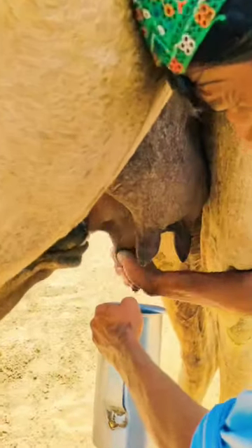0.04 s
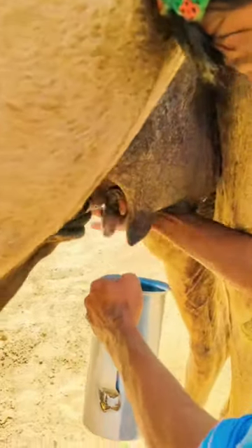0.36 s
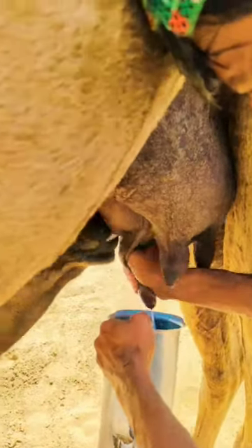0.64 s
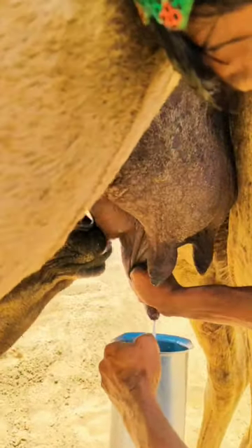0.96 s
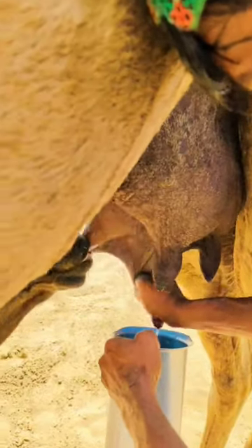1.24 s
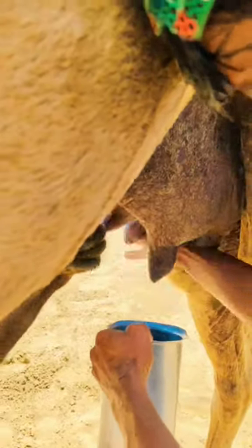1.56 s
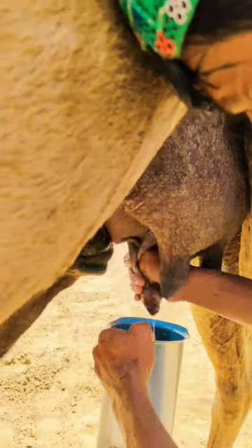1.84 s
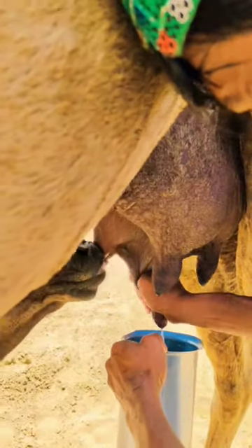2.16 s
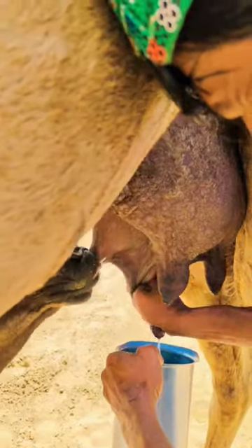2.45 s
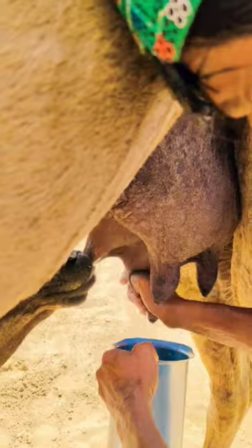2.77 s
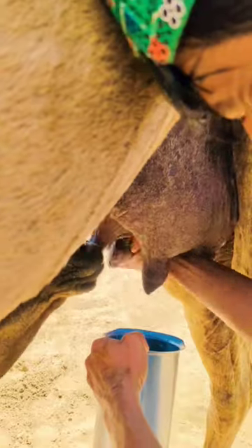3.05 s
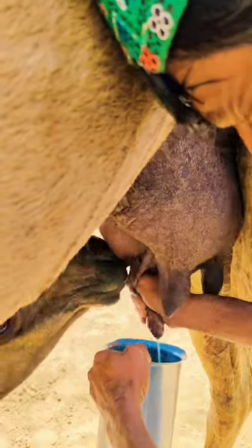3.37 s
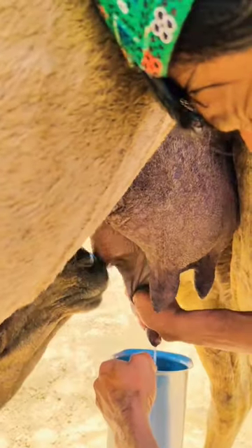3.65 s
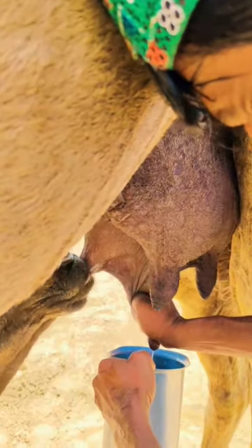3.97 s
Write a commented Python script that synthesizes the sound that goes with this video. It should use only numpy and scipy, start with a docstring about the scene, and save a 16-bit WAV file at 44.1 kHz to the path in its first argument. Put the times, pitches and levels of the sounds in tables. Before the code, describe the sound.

Milk is squirted by hand into a small metal pail, four slow pulls that bubble, spatter and fizz in the froth. Soft dull handling bumps, wet clicks and one light knock come close to the microphone, over faint outdoor air.

```python
"""Milk squirted by hand into a small metal pail, outdoors, close to one microphone: four slow pulls.
Each jet churns bubbles in the milk, spatters on the pail's wall and makes the froth fizz.
Hands and pail give one knock and soft dull bumps, and wet fingers click.
Faint open-air noise lies behind."""
import sys
import numpy as np
from scipy import signal
from scipy.fft import rfft, irfft
from scipy.io import wavfile

SR = 44100
rng = np.random.default_rng(int(sys.argv[2]) if len(sys.argv) > 2 else 0)


def wav_out(sig):
    """Save sig, one row per channel (or a flat mono array), as 16-bit PCM at SR to the path in sys.argv[1]."""
    wavfile.write(sys.argv[1], SR, np.round(np.clip(np.atleast_2d(sig).T, -1, 1) * 32767).astype(np.int16))


N = 176400

# The four pulls on the teat, a list for each. Each row: time in seconds, then relative levels in dB
# of churning, spatter on the wall, spray on the froth and fizz.
SQUIRTS = [
    [(0, -41, -51.5, -58, -62), (0.05, -39, -68.5, -67, -76), (0.13, -42, -68, -73, -81),
     (0.2, -50, -72, -72, -76), (0.27, -52, -73, -76, -70.5), (0.33, -66, -93, -86, -70),
     (0.37, -84, -84, -81, -76)],
    [(0.68, -53.5, -65.5, -83, -69), (0.79, -61.5, -82, -67.5, -64), (0.832, -52.5, -61, -60.5, -61.5),
     (0.85, -47, -59, -55.5, -49.5), (0.875, -46.5, -48.5, -53.5, -57), (0.97, -36.5, -50.5, -56, -51),
     (1.01, -40.5, -53, -54.5, -53.5), (1.045, -35, -47.5, -51, -55), (1.09, -37.5, -53.5, -52.5, -57.5),
     (1.33, -38.5, -57.5, -51, -60.5), (1.45, -40.5, -64, -57.5, -59.5), (1.53, -41.5, -68, -74, -74),
     (1.59, -59.5, -77, -77, -64.5), (1.66, -77, -90, -99, -71)],
    [(1.98, -76, -69.5, -81, -82), (2.05, -44.5, -66, -67, -70), (2.19, -45, -64, -65, -73),
     (2.25, -43.5, -58, -63, -64.5), (2.34, -40.5, -58, -53.5, -59), (2.54, -38, -59, -54, -61.5),
     (2.6, -37.5, -65, -61.5, -65.5), (2.72, -41, -64, -62.5, -63), (2.86, -40, -64, -64, -66),
     (2.96, -51, -66, -87, -70), (3.08, -75, -81, -89, -72)],
    [(3.3, -100, -99, -74.5, -77), (3.42, -57.5, -68, -68, -67), (3.54, -59, -71.5, -70.5, -65),
     (3.63, -47.5, -57.5, -62.5, -61.5), (3.69, -43, -58, -66.5, -70), (3.76, -40.5, -60, -68.5, -64.5),
     (3.85, -40, -63, -68, -68.5), (4, -43, -64.5, -70, -74)],
]
def squirt_gain(part):
    """Gain of one part of the jet's sound through all pulls, fading quickly between them."""
    column = 1 + ["churn", "spatter", "spray", "fizz"].index(part)
    t, gain = np.arange(N) / SR, 0
    for rows in map(np.array, SQUIRTS):
        outside_s = np.abs(t - np.clip(t, rows[0, 0], rows[-1, 0]))
        gain += from_db(np.interp(t, rows[:, 0], rows[:, column])) * np.exp(-outside_s / 0.011)
    return gain


# Bubble sizes, pull by pull. Each row: favoured pitch in Hz, its emphasis in dB, big-bubble gain in dB.
BUBBLE_SIZES = [(402, 8, 4), (505, 0.5, 1.5), (334, 3, 2.5), (423, 2, -1)]
# Tone of the churning milk from close by. Each row: frequency in Hz, relative level in dB.
CHURN_COLOUR = [(130, -22.5), (185, 2.5), (260, -7.5), (360, -0.5), (540, 1), (660, -5.5), (800, -12.5),
                (1000, -23.5), (1400, -49)]
BUBBLE_CYCLES, BUBBLE_RISE = 14.1, 0.1
def churning(bubbles_per_s=650):
    """The jet drives air under the milk: a swarm of short bubble rings."""
    swarm, later_starts = np.zeros(N), [rows[0][0] for rows in SQUIRTS[1:]]
    for when, pitch, size, sign in rng.random((int(bubbles_per_s * N / SR), 4)):
        start, hz = when * N / SR, 140 * 2 ** (3 * pitch)
        favoured_hz, emphasis_db, big_db = BUBBLE_SIZES[np.searchsorted(later_starts, start)]
        nearness = np.exp(-(np.log2(hz / favoured_hz) / 0.29) ** 2)
        db = emphasis_db * (nearness - 0.5) + big_db * (hz < 290) - 2.5 * np.log(size + 0.11)
        add(swarm, start, bubble(hz, BUBBLE_CYCLES) * hz * np.sign(sign - 0.5) * from_db(db))
    return colour(swarm, CHURN_COLOUR) * from_db(0.5) * squirt_gain("churn")


# Plops in the milk, and the hollow upper tone of one handling bump between pulls.
# Each row: start in seconds, relative level in dB, central pitch in Hz.
PLOPS = [(0.045, -35.5, 400), (.129, -32.5, 404), (0.234, -40.5, 476), (.898, -29, 572), (1.04, -26, 440),
         (1.154, -32, 530), (1.198, -31, 384), (1.512, -30.5, 202.6), (1.524, -35.5, 320),
         (2.149, -36.5, 547), (2.171, -26, 480), (2.253, -30.5, 516), (2.485, -36, 440),
         (2.615, -28.5, 354), (3.151, -44.5, 420), (3.399, -43.5, 560), (3.684, -27, 490),
         (3.735, -41, 520), (3.795, -32.5, 535), (3.83, -35.5, 397), (3.862, -36, 420)]
def plops(gap_s=0.006, loss_db=3.5):
    """Each plop, like the one bump's hollow tone, is three bubble rings, each fainter than the last."""
    out = np.zeros(N)
    for start, db, hz in PLOPS:
        for k, detune in enumerate(rng.uniform(0.854, 1.18, size=3)):
            ring = bubble(hz * detune, cycles=18.6)
            add(out, start + k * gap_s, ring * from_db(db - 0.5 - k * loss_db))
    return out


def bubble(hz, cycles):
    """A bubble rings, rising a little in pitch and dying by 60 dB over about this many cycles."""
    age = np.arange(int(cycles / hz * SR)) * hz / SR / cycles
    turns = cycles * age + BUBBLE_RISE * BUBBLE_CYCLES * age ** 2
    return np.sin(2 * np.pi * turns) * from_db(-60 * age)


# Tones of drops on the wall, drops on the froth and bursting bubbles, heard at the pail.
# Each row: frequency in Hz, relative level in dB.
SPATTER_COLOUR = [(500, -26), (750, 0), (1000, -6), (1280, -0.5), (1450, 0.5), (1600, -0.5), (1720, -13),
                  (2400, -18.5), (4000, -24)]
SPRAY_COLOUR = [(1200, -34), (1720, -24.5), (1870, -0.5), (2050, 0), (2200, -1.5), (2380, 5.5),
                (2800, -0.5), (3150, -21), (3800, -16.5), (4500, -22.5), (5200, -23.5), (6000, -27),
                (9000, -53)]
FIZZ_COLOUR = [(3000, -34.5), (4600, 2), (5800, -18.5), (6600, 0.5), (7350, 3.5), (8100, -2), (8700, -2.5),
               (10000, -2.5), (11200, -1.5), (12400, -2.5), (14500, 8), (15600, 1.5)]
FIZZ_PER_S, FIZZ_SPREAD_DB = 14000, 7.5
def droplets():
    """The unsteady jet breaks into drops that drum on wall and froth, and tiny bubbles burst."""
    drops, pings = rms_one(grains(per_s=3500, spread_db=3)), froth()
    bursts = rms_one(grains(FIZZ_PER_S, FIZZ_SPREAD_DB)) + 0.6 * pings + 1.2 * swirl()
    spatter = colour(drops, SPATTER_COLOUR) * from_db(2.5) * squirt_gain("spatter")
    spray = colour(drops + 0.27 * pings, SPRAY_COLOUR) * from_db(0.5) * squirt_gain("spray")
    fizz = colour(bursts, FIZZ_COLOUR) * from_db(0.5) * squirt_gain("fizz")
    flutter = from_db(1.72 * drift(hz=28))
    return pail_echoes((spatter + spray + fizz) * flutter)


def froth(pings_per_s=2600):
    """Tiny bubbles ping at random pitches; rms 1."""
    out = np.zeros(N)
    for when, pitch, size in rng.random((int(pings_per_s * N / SR), 3)):
        hz = 1500 + 14000 * pitch
        strength = np.sqrt(hz) * (0.3 - np.log(size + 0.029))
        add(out, when * N / SR, strength * bubble(hz, cycles=103))
    return rms_one(out)


def swirl(wander_oct=0.028, sink_oct_per_s=0.25, swell_db=4):
    """Fizz in the hollow the jet digs: its resonances swell, wander and sink through each pull; rms 1."""
    t, starts = np.arange(N) / SR, np.array([rows[0][0] for rows in SQUIRTS])
    pull_age = t - starts[np.maximum(np.searchsorted(starts, t) - 1, 0)]
    out = np.zeros(N)
    for hz in np.linspace(2930, 17070, 16):
        octaves = wander_oct * drift(hz=7) - sink_oct_per_s * pull_age
        ring = resonate(grains(FIZZ_PER_S, FIZZ_SPREAD_DB), hz * 2 ** octaves, width_hz=700)
        out += from_db(swell_db * drift(hz=7)) * ring
    return rms_one(out)


# The jet's strongest resonances. Each row: middle and length in seconds, pitch at the middle in Hz,
# slide in octaves per second, relative level in dB.
WHISTLES = [(.9, .14, 5300, 0.4, -76), (0.996, 0.14, 7450, -0.33, -58.5), (0.99, 0.23, 10200, -1.1, -61.5),
            (1.17, 0.3, 11100, -.3, -61.5), (1.36, 0.24, 7320, -0.048, -62), (1.23, 0.23, 14000, -.15, -59),
            (2.32, 0.12, 7200, -0.5, -62.5), (2.37, 0.14, 8440, -0.47, -60.5),
            (2.51, 0.26, 6850, 0.62, -68), (2.5, 0.31, 8970, 0.035, -71), (2.53, 0.21, 14750, 0, -69),
            (3.6, .12, 14100, 0, -65), (3.24, 0.34, 7200, 0, -75.5)]
def whistles(wander_oct=0.0073):
    """Bursting froth excites resonances that swell, slide in pitch and fade."""
    out, bursts = np.zeros(N), grains(FIZZ_PER_S, FIZZ_SPREAD_DB)
    for middle, length, hz, slide, db in WHISTLES:
        t = np.clip(np.arange(N) / SR - middle, -length, length)
        centre_hz = hz * 2 ** (slide * t + wander_oct * drift(hz=7))
        swell = from_db(db - 2.5) * np.exp(-(2 * t / length) ** 4)
        out += swell * resonate(bursts, centre_hz, width_hz=780)
    return out


# Tone of a lone drop on the metal. Each row: frequency in Hz, relative level in dB.
STRAY_COLOUR = [(900, -16), (1400, -3), (2300, 3), (4500, 0.5), (5800, -17), (7300, -3), (10000, -7.5),
                (14500, -1.5)]
def stray_drops():
    """Stray droplets tick faintly on the pail at random moments."""
    ticks = colour(grains(per_s=22, spread_db=2), STRAY_COLOUR)
    return from_db(-76.5) * pail_echoes(ticks)


# Echoes inside the pail. Each row: shortest delay in seconds, amplitude relative to the direct sound.
PAIL_ECHOES = [(.00088, 0.54), (.0023, -0.16), (.0037, 0.34), (.0061, -0.16)]
def pail_echoes(x, stretch=0.127):
    """Wall echoes give a hollow tint that sweeps down and back as the jet swings over in each pull."""
    n, swing = np.arange(N), 0
    for rows in SQUIRTS:
        start, end = rows[0][0], rows[-1][0]
        swing += np.sin(np.pi * np.clip((n / SR - start) / (end - start), 0, 1))
    oversampled, out = signal.resample_poly(x, 4, 1), x
    for delay, share in PAIL_ECHOES:
        read_at = n - delay * SR * (1 + stretch * swing)
        out = out + share * np.interp(read_at, np.arange(4 * N) / 4, oversampled)
    return out / np.sqrt(1 + sum(share ** 2 for _, share in PAIL_ECHOES))


# Modes of the metal wall. Each row: frequency in Hz, relative level in dB.
WALL_MODES = [(1283, -23), (1409, -6), (1888, -12), (2055, 3), (2216, -4), (2334, -3), (2519, 3), (4470, 3),
              (7156, 0), (7414, -1)]
def wall_ring(x, t60_s=0.11):
    """The wall, damped by milk and hand, rings briefly along with the drops that strike it."""
    radius, out = from_db(-60 / (t60_s * SR)), x
    for hz, db in WALL_MODES:
        poles = [1, -2 * radius * np.cos(2 * np.pi * hz / SR), radius ** 2]
        ring = (1 - radius ** 2) / 2 * signal.lfilter([1, 0, -1], poles, x)
        out = out + from_db(db - 11) * ring
    return out


# The contacts of one knock on the pail. Each row: start in seconds, relative level in dB.
KNOCK_CONTACTS = [(0.4264, -45), (0.4285, -41.5), (.4317, -36), (0.436, -45.5)]
# What they ring. Each row: frequency in Hz, relative level in dB, seconds to fall by 60 dB.
KNOCK_MODES = [(430, -9, 0.012), (680, -4, 0.02), (1180, -5.5, 0.012), (1610, -2.5, .012),
               (2040, -5, 0.012), (2440, -6, 0.011), (2970, -21, 0.0076), (4200, -40, .5),
               (4550, -16, 0.008)]
def knock(spread_db=1):
    """A quick rattle of contacts, each ringing the hollow pail with strengths of its own."""
    out, age = np.zeros(N), np.arange(SR) / SR
    for start, db in KNOCK_CONTACTS:
        for hz, mode_db, t60 in KNOCK_MODES:
            strength_db = db + mode_db + spread_db * rng.standard_normal()
            add(out, start, from_db(strength_db - 60 * age / t60) * np.sin(2 * np.pi * hz * age))
    return out


# Low rumble of handling, near the microphone. Each row: time in seconds, relative level in dB.
RUMBLE_LEVEL = [(0.0, -82), (0.32, -62.5), (0.62, -51), (0.7, -44), (0.82, -46.5), (0.97, -55),
                (1.19, -54.5), (1.372, -49), (1.51, -70), (1.73, -68), (1.98, -57), (2.1, -51.5),
                (2.22, -51), (2.67, -49.5), (2.84, -50), (2.97, -71), (3.13, -53.5), (3.23, -57.5),
                (4.0, -56)]
# Its tone. Each row: frequency in Hz, relative level in dB.
RUMBLE_COLOUR = [(25, -27), (45, -18.5), (75, 2.5), (110, 3), (180, -5), (300, -15), (700, -33),
                 (2000, -41)]
# Dull bumps. Each row: middle in seconds, peak level in dB, pitch in Hz.
BUMPS = [(0.446, -33.5, 130), (.529, -26.5, 165), (0.556, -36, 128), (0.57, -34.5, 131), (0.665, -28, 120),
         (.674, -30.5, 192), (0.692, -25, 176), (.709, -25.5, 145), (.737, -31, 147), (.745, -28.5, 176),
         (0.793, -35, 112), (.819, -32.5, 128), (1.508, -33, 194.6), (1.937, -34.5, 131), (1.96, -45, 118),
         (2.014, -37, 151), (2.06, -28, 150), (2.066, -25, 168), (2.078, -25.5, 161), (2.106, -21.5, 187),
         (2.159, -31, 111), (2.246, -35.5, 98), (2.392, -32, 103), (2.54, -29.5, 162), (2.592, -27, 129),
         (2.796, -34, 144), (3.02, -37, 160), (3.035, -40, 126), (3.139, -36, 152), (3.152, -30, 158),
         (3.201, -31.5, 110), (3.211, -34, 136), (3.243, -43, 110), (3.376, -41.5, 106), (3.68, -30, 141),
         (3.689, -28, 228), (3.707, -25, 130)]
def handling(bump_cycles=0.48):
    """Hand and pail give soft bumps of a cycle or two over a lumpy low rumble."""
    t = np.arange(N) / SR
    rumble = colour(grains(per_s=130, spread_db=2.2), RUMBLE_COLOUR)
    out = rumble * from_db(4.5 + np.interp(t, *np.transpose(RUMBLE_LEVEL)))
    for middle, peak_db, hz in BUMPS:
        near = np.abs(t - middle) < 0.04
        cycles = (t[near] - middle) * hz
        envelope = from_db(peak_db) / np.cosh(1.58 * cycles / bump_cycles)
        out[near] += envelope * np.cos(2 * np.pi * cycles + rng.normal(0, 0.49))
    return out


# Close, wet clicks. Each row: peak time in seconds, relative level in dB, decay in seconds,
# then trims in dB for the body, crisp and treble bands.
CLICKS = [(0.2918, -49.5, 0.0023, -12, -14, 7.5), (0.428, -44, 0.0045, -2, -9, 3.5),
          (.748, -57.5, .002, -8, 6, 9), (.898, -37.5, 0.007, 6.5, -18, -18),
          (1.493, -45, 0.0022, 0, -18, -16), (1.511, -49, 0.0025, 7, -18, -16),
          (1.578, -58.5, .004, -2, -2, -7), (1.609, -57, .003, -15, 2.5, -6),
          (1.633, -68, 0.003, -12, -2, 15), (1.685, -65, 0.0045, 10, -15, -10),
          (1.76, -68.5, 0.0091, 13, -15, -10), (1.914, -62.5, 0.011, 2, 3.5, 12),
          (1.932, -64, 0.011, 0, -3, 7), (2.084, -47.5, 0.0038, 11, -10.5, -10),
          (2.128, -56, 0.0016, 6, -1, 7), (2.167, -53.5, .0025, -15, 7, 5),
          (3.024, -54.5, 0.0038, 2, 0, -9), (3.492, -52.5, 0.0035, 7, -4.5, -6)]
# The four bands of a click, low to high. Each row: frequency in Hz, relative level in dB.
CLICK_BODY = [(200, -20), (550, 9.5), (1000, -4), (1500, 3), (1800, -9), (3500, -31)]
CLICK_SNAP = [(1200, -6), (2050, 4.5), (2900, 4), (4000, -17.5), (5500, -8.5), (8000, -23.5)]
CLICK_CRISP = [(2500, -23), (3700, 11), (5200, 8), (7000, -11), (10000, -15)]
CLICK_TREBLE = [(4000, -44), (6800, 9), (8500, 3.5), (12000, 0), (14500, 7.5)]
def wet_clicks(attack_s=0.00088):
    """Wet fingers and stray drops click: each a tight cluster of tiny snaps with its own brightness."""
    t, out = np.arange(N) / SR, np.zeros(N)
    snaps = grains(per_s=16000, spread_db=0.81)
    bands = (CLICK_BODY, CLICK_SNAP, CLICK_CRISP, CLICK_TREBLE)
    body, snap, crisp, treble = [colour(snaps, band) for band in bands]
    for when, db, decay_s, body_db, crisp_db, treble_db in CLICKS:
        fade = np.maximum((t - when) / decay_s, (when - t) / attack_s)
        envelope = from_db(db) * np.exp(-np.minimum(fade, 50))
        out += envelope * (body * from_db(body_db) + snap * from_db(-7)
                           + crisp * from_db(crisp_db - 4) + treble * from_db(treble_db - 7))
    return out


# The open air behind the pail. Each row: frequency in Hz, relative level in dB.
AIR_COLOUR = [(30, -19), (114, -2), (182, -1.5), (420, -2.5), (600, -6), (900, -12), (1300, -13),
              (1870, -16.5), (2300, -20.5), (3400, -22), (5800, -28), (7260, -26), (10000, -29),
              (15500, -30)]
# Its rise and fall. Each row: time in seconds, relative level in dB.
AIR_LEVEL = [(0, -1), (.5, 1.5), (1.0, 3), (1.661, -4), (1.85, 0.5), (2.299, 2.5), (3.12, -0.5), (3.3, 0.5),
             (4, -1)]
def open_air(level_db=-60):
    """Faint outdoor noise, slowly changing in level."""
    swell_db = np.interp(np.arange(N) / SR, *np.transpose(AIR_LEVEL))
    return from_db(level_db + swell_db) * colour(rng.standard_normal(N), AIR_COLOUR)


def from_db(db):
    """Decibels to amplitude."""
    return 10 ** (np.asarray(db) / 20)


def rms_one(x):
    """Scale a sound to rms 1."""
    return x / np.sqrt(np.mean(x ** 2) + 1e-20)


def add(out, when, sound):
    """Mix a sound in at this time in seconds."""
    part = out[int(when * SR):int(when * SR) + len(sound)]
    part += sound[:len(part)]


def colour(x, points, size=8192):
    """Causal filter through (Hz, dB) points, falling steeply beyond their ends; rms 1."""
    point_hz, point_db = np.transpose(points)
    hz = np.arange(size // 2 + 1) * SR / size + 1
    db = np.interp(np.log(hz + 1), np.log(point_hz), point_db)
    octaves_beyond = np.abs(np.log2(hz / np.clip(hz, point_hz[0], point_hz[-1])))
    cepstrum = irfft(np.log(from_db(db - 20 * octaves_beyond)))
    cepstrum[1:size // 2] *= 2   # fold onto positive time for minimum phase
    cepstrum[size // 2 + 1:] = 0
    impulse = irfft(np.exp(rfft(cepstrum)))
    return rms_one(signal.fftconvolve(x, impulse)[:N])


def drift(hz):
    """Smooth random wander up to about this rate; rms 1."""
    knots = rng.standard_normal(4000)
    return rms_one(np.interp(np.arange(N) / SR * hz * 2, np.arange(len(knots)), knots))


def grains(per_s, spread_db):
    """Random clicks of uneven size."""
    sizes = from_db(spread_db * np.minimum(rng.exponential(1, N), 4))
    return sizes * rng.choice([-1, 1], N) * (rng.random(N) < per_s / SR)


def resonate(x, hz, width_hz):
    """Pass a sound through one resonance whose centre moves; rms 1."""
    turn = np.exp(2j * np.pi * np.cumsum(hz) / SR)
    radius = np.exp(-np.pi * width_hz / SR)
    return rms_one((turn * signal.lfilter([1], [1, -2 * radius, radius ** 2], x / turn)).real)


def scene():
    """Milk, hands and open air at one close microphone."""
    pail = churning() + plops() + wall_ring(droplets() + stray_drops()) + whistles()
    return (pail + handling() + wet_clicks() + knock() + open_air())[None]


def record(dry, low_hz=53.4, top_hz=15650):
    """The microphone sheds the deepest bass; the top is cut steeply."""
    low_cut = signal.butter(2, low_hz, "high", fs=SR, output="sos")
    top_cut = signal.ellip(12, 0.2, 70, top_hz, fs=SR, output="sos")
    return signal.sosfilt(top_cut, signal.sosfilt(low_cut, dry))


dry = scene()
out = record(dry)
wav_out(out)
```